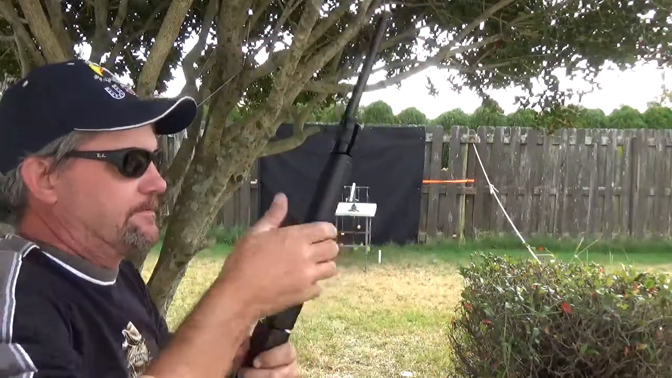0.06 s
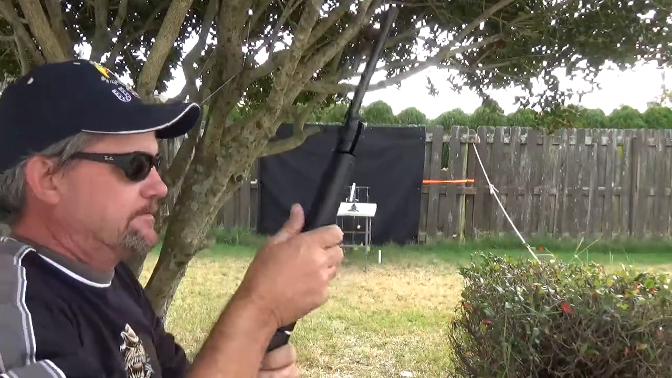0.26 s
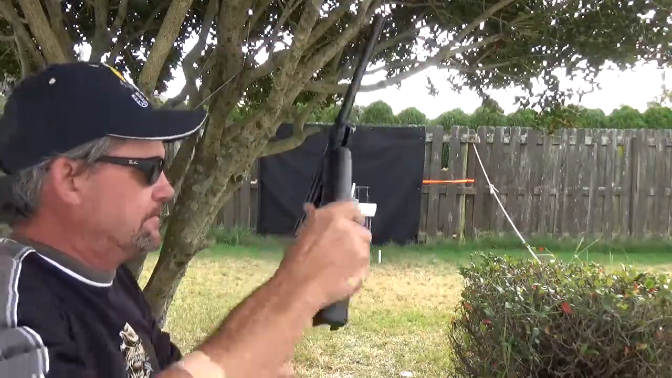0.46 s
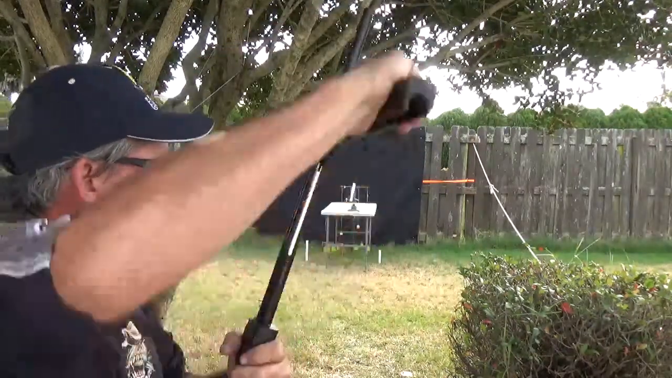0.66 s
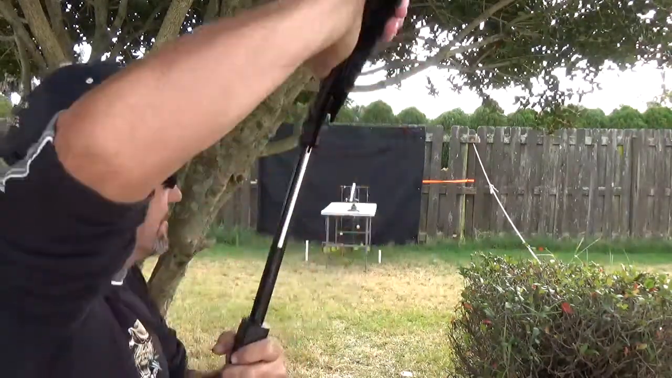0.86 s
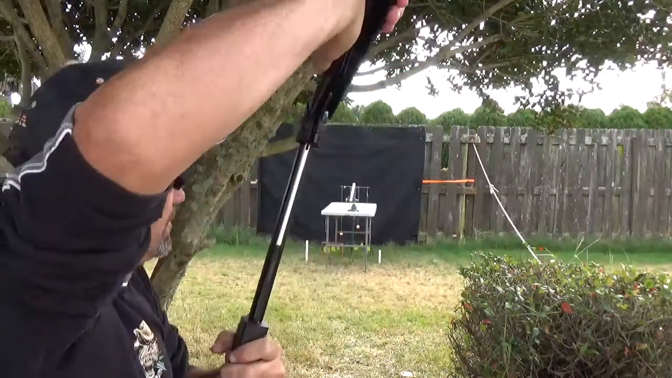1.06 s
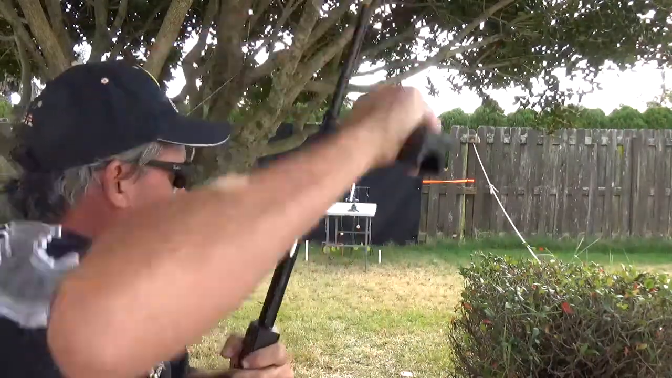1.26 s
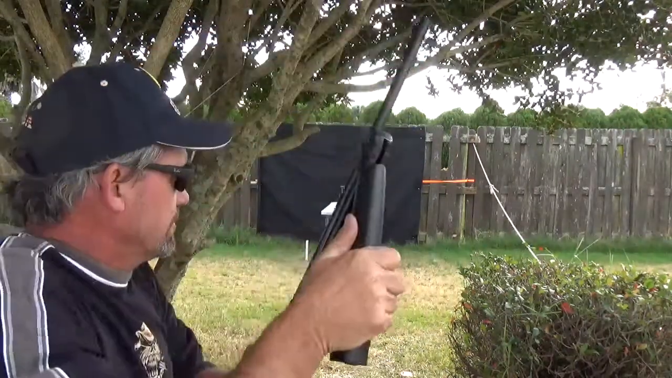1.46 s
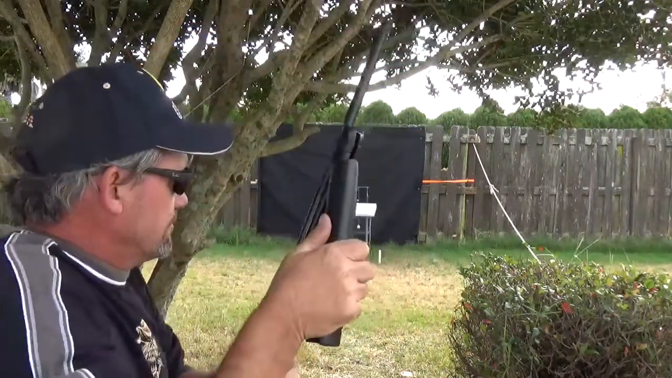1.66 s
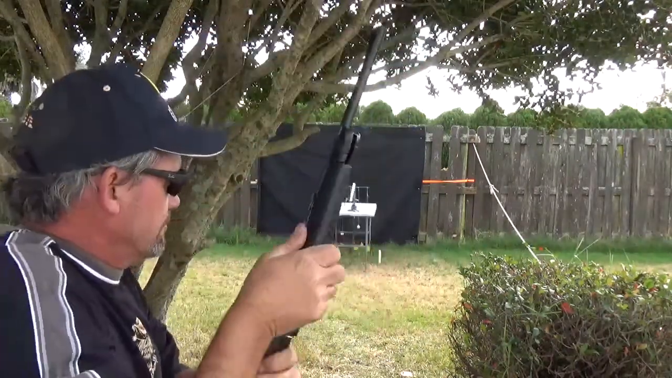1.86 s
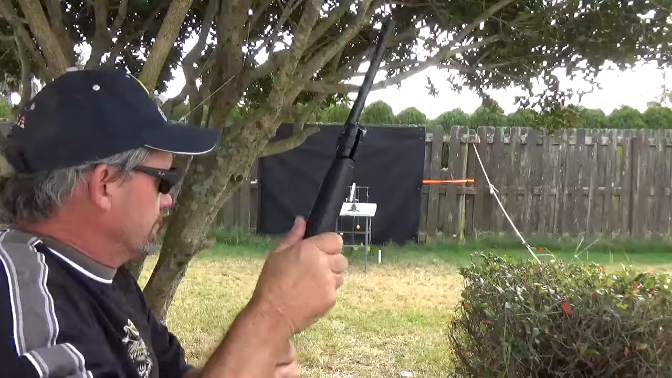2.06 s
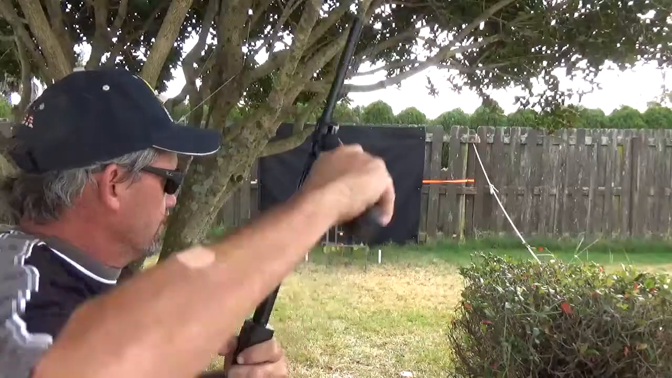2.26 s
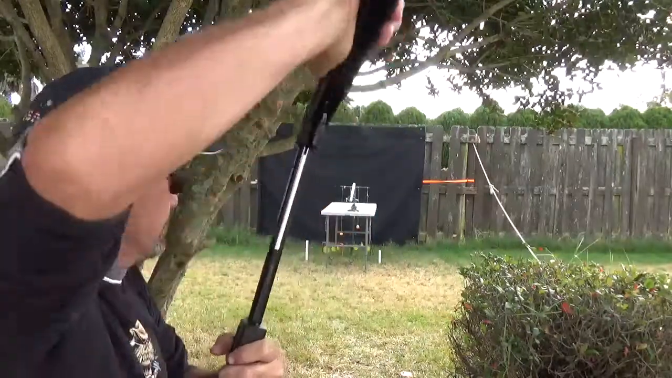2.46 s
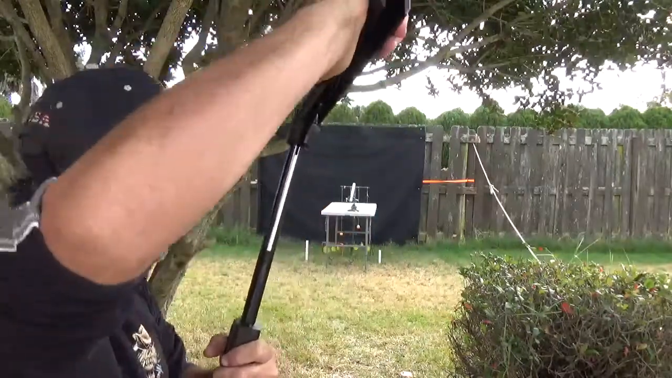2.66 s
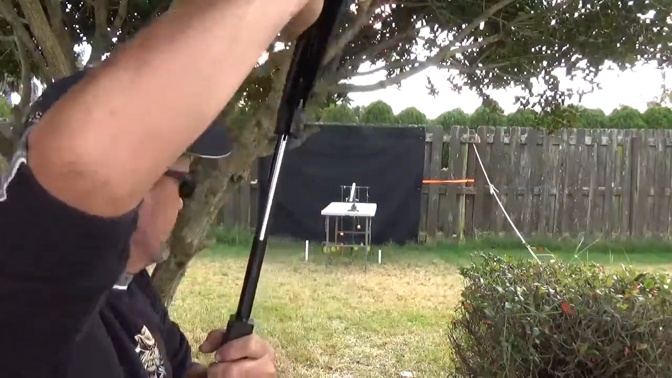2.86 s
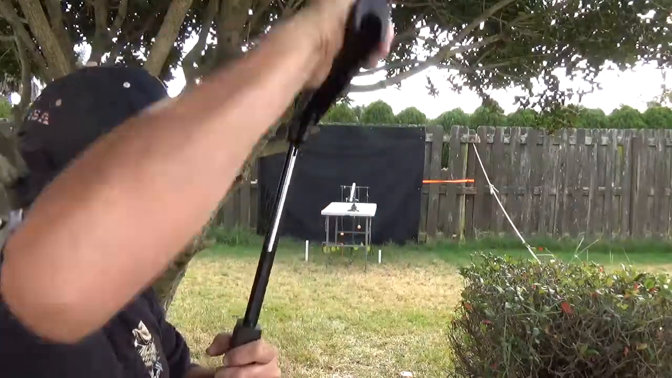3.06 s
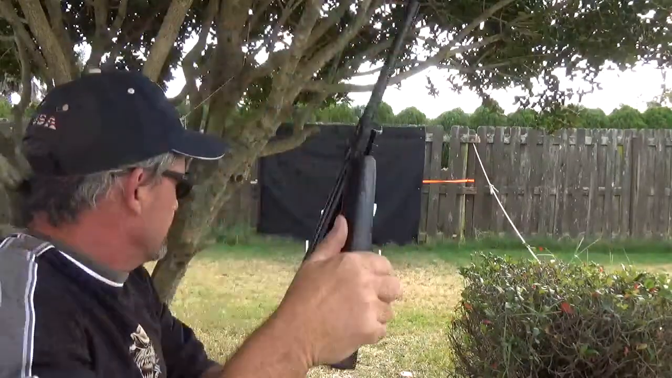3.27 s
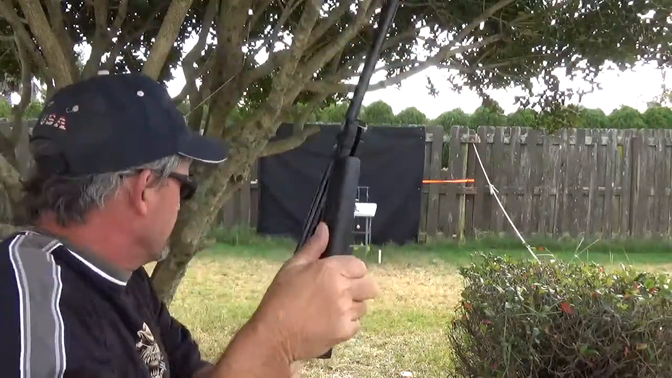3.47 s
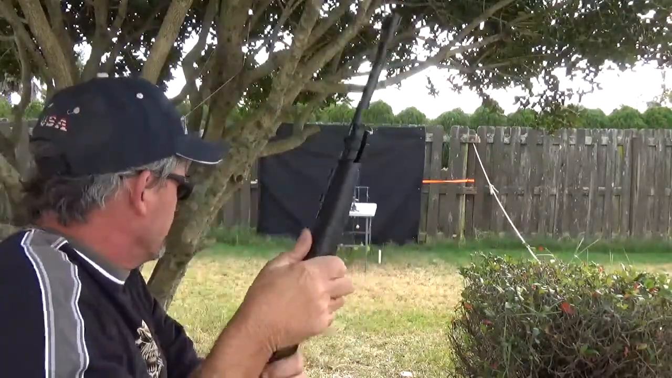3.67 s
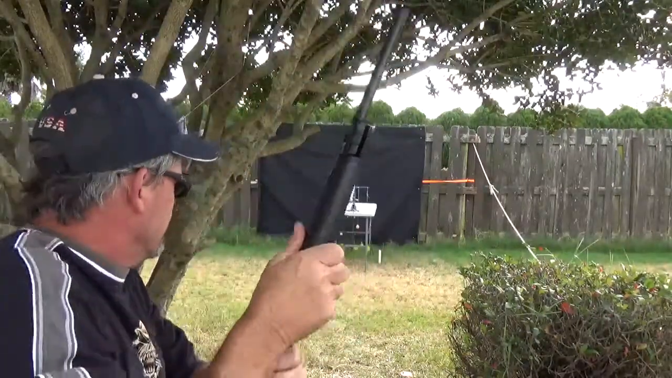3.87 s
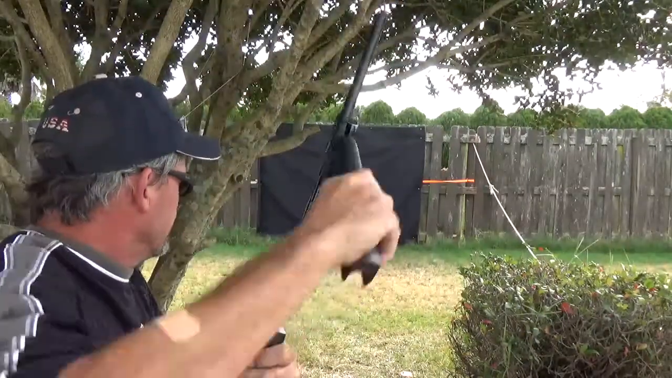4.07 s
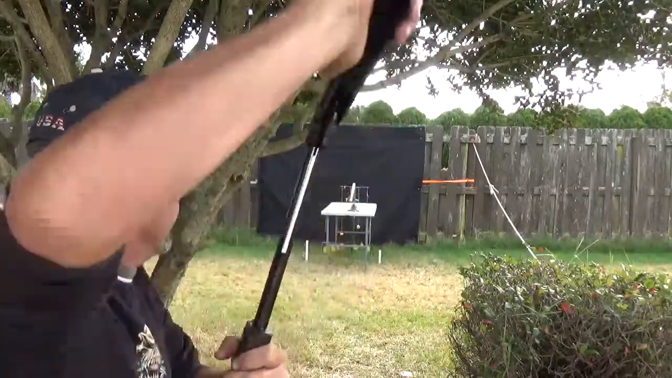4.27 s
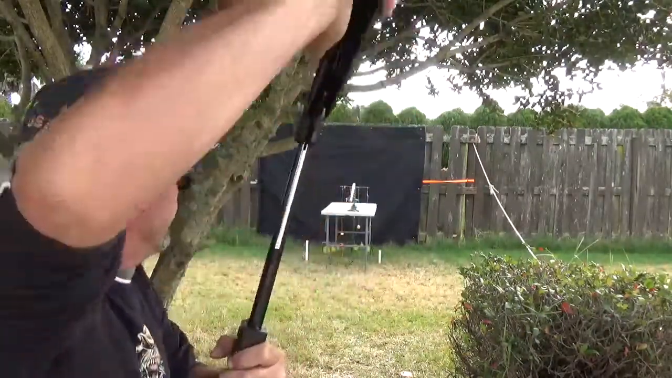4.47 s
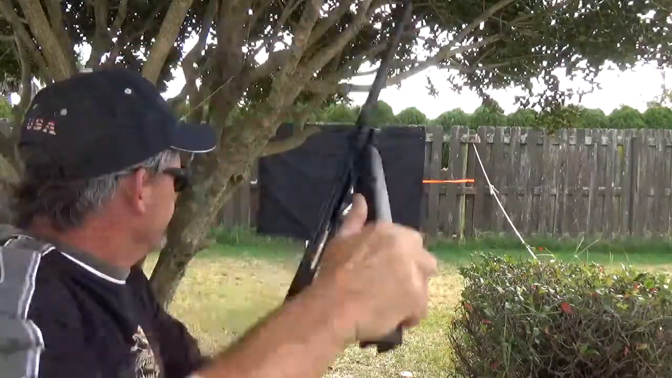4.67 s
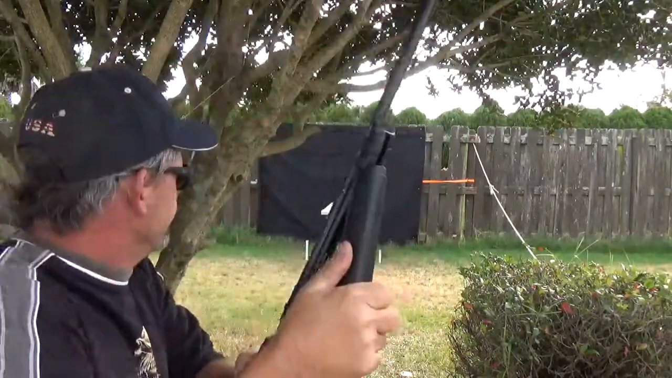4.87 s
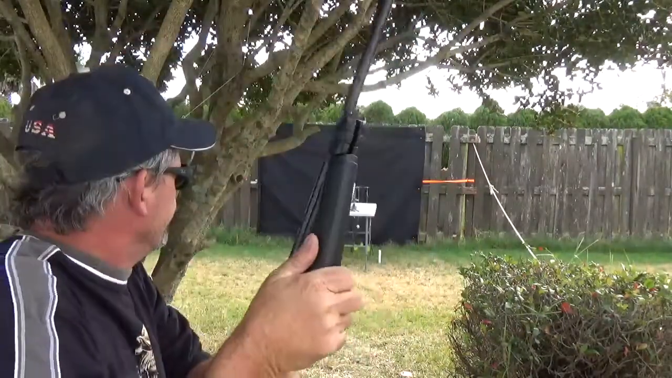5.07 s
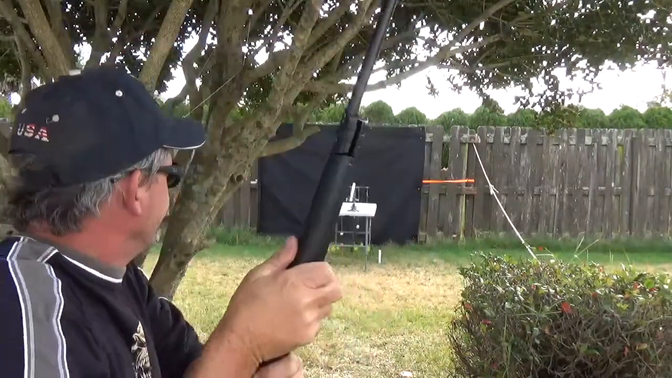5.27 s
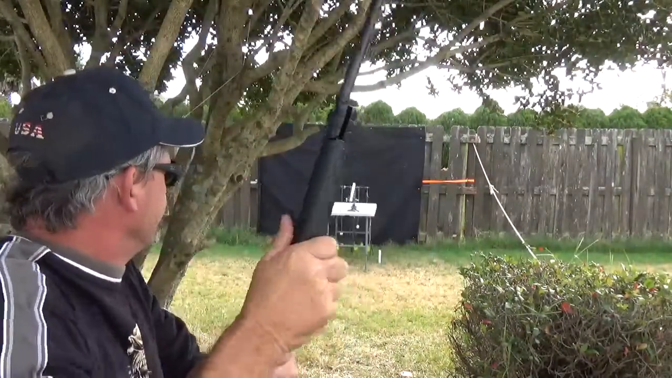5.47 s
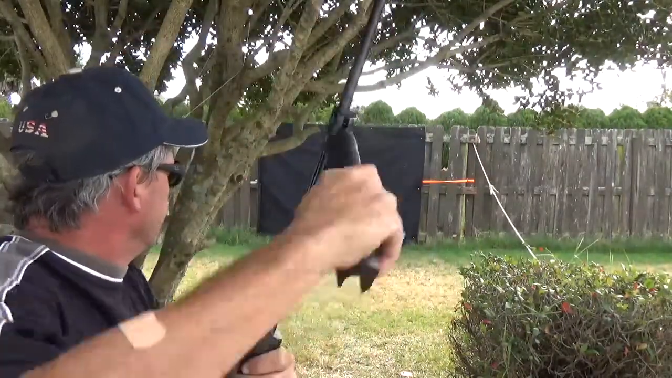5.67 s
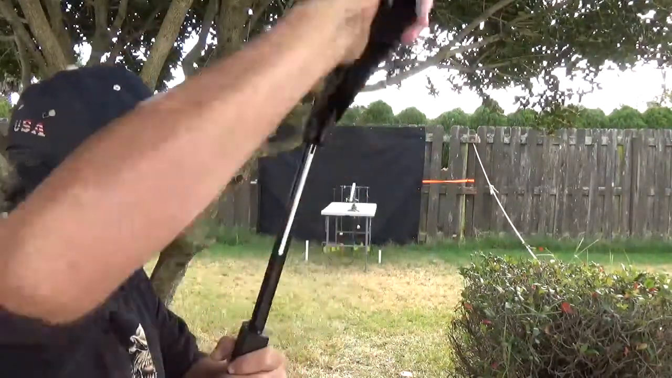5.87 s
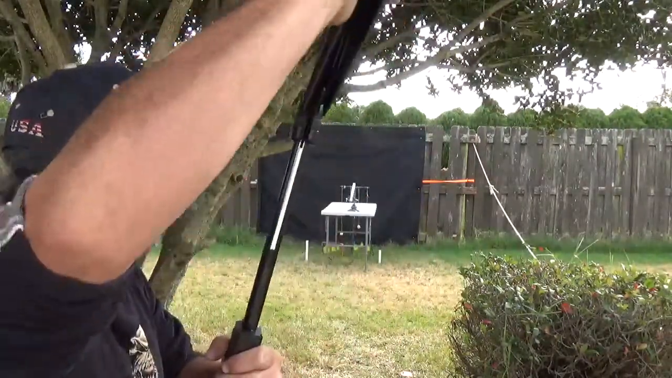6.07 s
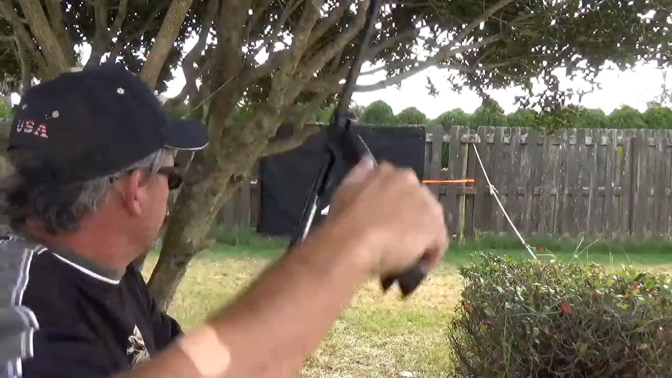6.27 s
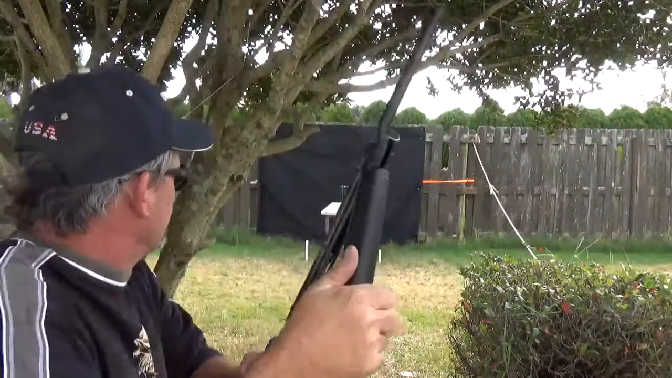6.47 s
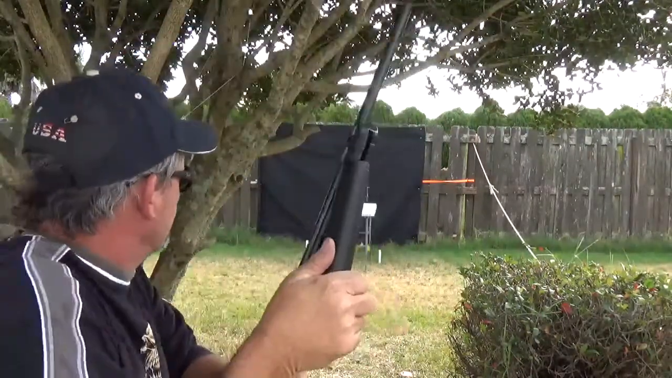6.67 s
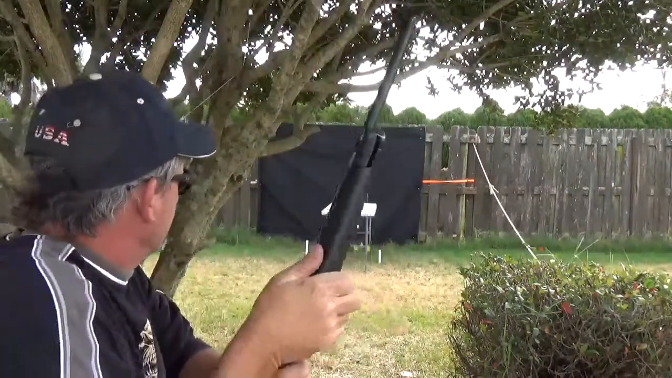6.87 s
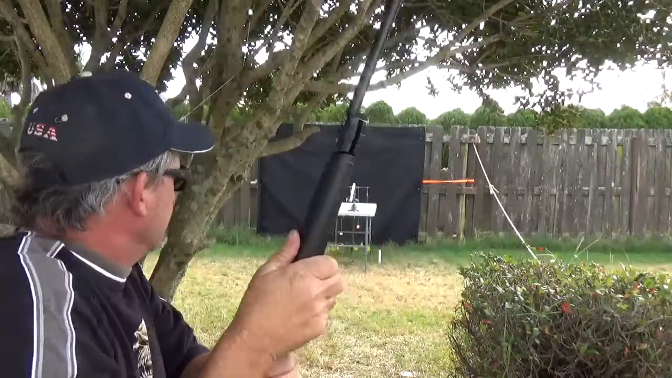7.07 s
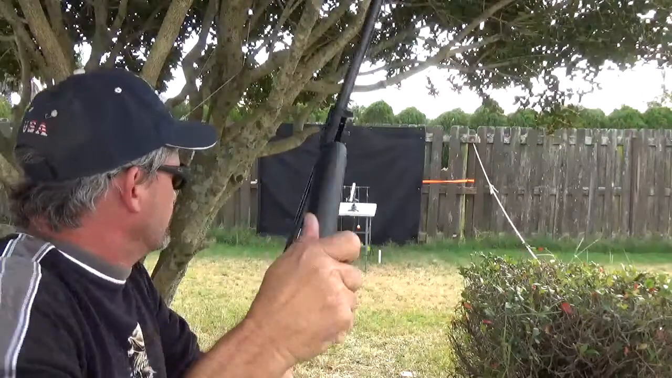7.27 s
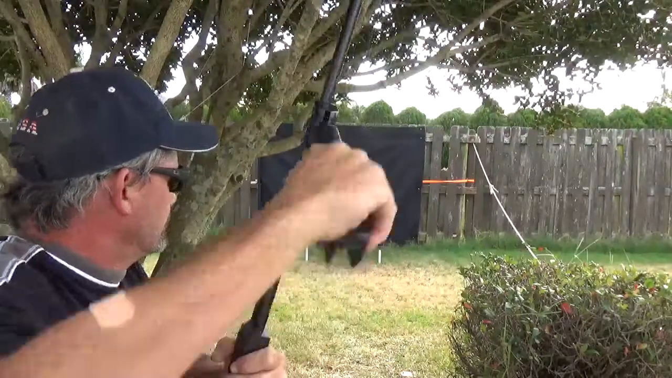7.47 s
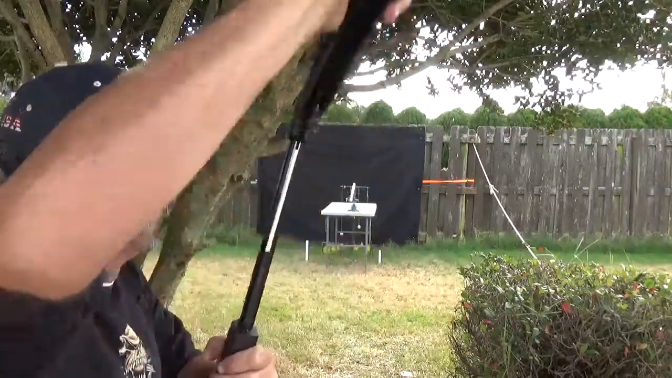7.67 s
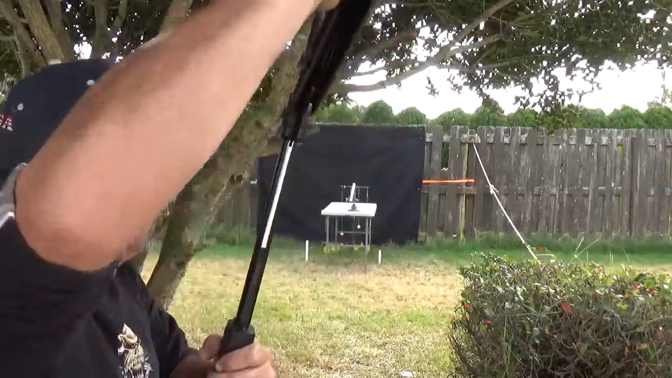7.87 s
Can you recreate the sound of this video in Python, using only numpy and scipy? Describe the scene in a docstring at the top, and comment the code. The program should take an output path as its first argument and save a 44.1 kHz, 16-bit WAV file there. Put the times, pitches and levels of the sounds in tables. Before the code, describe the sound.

Close outdoors, an air rifle's pump lever snaps free with a sharp crack, ticks open, then slams shut with a metallic buzz, over and over.

```python
"""A far traffic hum and soft rubbing come first, with faint scratches; then the lever of an air rifle snaps free.
In a fenced garden, an arm's length from a camera, the pump lever is swung open and pressed shut, again and again.
It scrapes home, slams and buzzes; pivots tick and the fences echo. Hum, rubbing, scrape and buzz are shaped noise.
Knocks are short noise bursts that ring the rifle's modes (its own pitches); whistles and the tube's song are sines."""
import sys
import numpy as np
from scipy import signal
from scipy.fft import rfft, irfft, next_fast_len
from scipy.io import wavfile
from scipy.ndimage import uniform_filter1d

SR = 44100
rng = np.random.default_rng(int(sys.argv[2]) if len(sys.argv) > 2 else 0)


def unload_wav(signal):
    """Save mono or channel-first audio to the path in sys.argv[1] as 16-bit WAV at rate SR, clipped to [-1, 1]."""
    wavfile.write(
        sys.argv[1],
        SR,
        np.round(np.clip(np.atleast_2d(signal).T, -1, 1) * 32767).astype(np.int16),
    )


N = 349272
TIME = np.arange(N) / SR
SPLIT_HZ = 3000  # "low" modes and "deep" sound lie below


def undb(db):
    """Turn decibels into an amplitude factor."""
    return 10 ** (np.asarray(db) / 20)


def unit(x):
    """Scale to rms 1."""
    return x / np.sqrt(np.mean(x ** 2))


def at_peak_one(x):
    """Scale to peak 1."""
    return x / abs(x).max()


def fade(t, t60):
    """Exponential decay that falls 60 dB in t60 s (at least 1 ms)."""
    return np.exp(-np.log(1000) * t / np.maximum(t60, .001))


def onset(t, rise_s):
    """Smooth start that climbs towards 1."""
    return 1 - np.exp(-t / rise_s)


def band(x, lo_hz, hi_hz):
    """Keep only the sound between two pitches."""
    return signal.sosfilt(signal.butter(2, [lo_hz, hi_hz], "bandpass", fs=SR, output="sos"), x)


def coloured(spectrum):
    """Noise with the given spectrum, rms 1."""
    hz, db = np.transpose(spectrum)
    size = next_fast_len(N)
    f = np.maximum(np.arange(size // 2 + 1) * SR / size, 1)
    gain = undb(np.interp(np.log(f), np.log(hz), db))
    white = rng.standard_normal(size)
    return unit(irfft(rfft(white) * gain, size)[:N])


def walk(rate):
    """Random wandering: levels held 1 / rate s, then smoothed twice."""
    hold = int(SR / rate)
    steps = np.repeat(rng.standard_normal(N // hold + 1), hold)
    return uniform_filter1d(uniform_filter1d(steps, hold), hold)[:N]


def halves(x):
    """Low and high part of a sound, each rms 1."""
    filters = [signal.butter(3, SPLIT_HZ, kind, fs=SR, output="sos") for kind in ("low", "high")]
    return [unit(signal.sosfilt(sos, x)) for sos in filters]


def patches(noise, edges, gains):
    """Bands of noise, each with its own moving gain; shifted in time so that neighbours are unrelated."""
    return sum(band(np.roll(noise, k * SR // 3), edges[k], edges[k + 1]) * g for k, g in enumerate(gains))


def stereo(mid, side, side_db):
    """Left and right from a middle and a side signal."""
    return mid + undb(side_db) * side * np.array([[1], [-1]])


# loudness of the far road, before a small random waver: (time [s], level [dB])
TRAFFIC_LEVEL = [(0, -52.5), (1.65, -54), (2.27, -49.5), (2.65, -54), (3.35, -49), (4.12, -52.5),
                 (4.4, -56.5), (5.3, -56.5), (5.6, -59.5), (6, -59), (7.92, -56)]
# colour of the road hum: (frequency [Hz], level per Hz [dB])
HUM_COLOUR = [(12, -63), (20, -44), (42, -15), (75, -8), (100, -4.5), (146, 0), (248, -11), (315, -9.5),
              (567, -25), (720, -21), (900, -42.5), (1170, -54), (1980, -120)]


def traffic():
    """Distant road rumble: deep noise whose level drifts."""
    level_db = np.interp(TIME, *np.transpose(TRAFFIC_LEVEL)) + 1.8 * walk(8)
    return undb(level_db) * stereo(coloured(HUM_COLOUR), coloured(HUM_COLOUR), -18)


FENCE_T60_S, FENCE_DB, FENCE_SIDE_DB = 0.6, -17, -16


def fences(dry):
    """A spray of echoes from fences, tree and lawn, a little different left and right."""
    t = np.arange(SR) / SR
    mid, side = rng.standard_normal((2, SR)) * fade(t, FENCE_T60_S) * onset(t, 0.011)
    wet = [band(signal.fftconvolve(dry, h / np.linalg.norm(h))[:N], 500, 6800) for h in (mid, side)]
    return undb(FENCE_DB) * stereo(*wet, FENCE_SIDE_DB)


RUB_DB, RUB_DRIFT_DB_PER_S, RUB_LOW_DB, LOW_SWELL_SHARE = -59.5, -0.54, -61.5, 0.1
SLEEVE_HZ, SLEEVE_WIDTH_HZ, SLEEVE_DB = 5560, 700, -11  # a resonance in the rubbing hiss
# colour of the rubbing of piston and sleeves: (frequency [Hz], level per Hz [dB])
HISS_COLOUR = [(290, -7), (500, 4), (584, -6.5), (709, -2.5), (872, -2), (1660, -6), (2650, -6), (3220, -9),
               (5610, -8), (10000, -9.5), (11000, -8.5), (14300, -41), (22000, -120)]
# the arm swings the lever up or down: (middle [s], length [s], swell of the rubbing [dB])
SWINGS = [(0.558, 0.31, 5.5), (1.46, 0.26, 4.5), (2.42, 0.17, 5.5), (3.214, 0.38, 5), (4.2, 0.57, 6),
          (4.676, 0.46, 5), (5.852, 0.28, 6.5), (6.324, 0.16, 10), (7.05, .2, 3.5), (7.592, .35, 6)]
# the arm rests at the top of the swing and the bright rubbing drops: (start [s], end [s], change [dB])
RESTS = [(0.938, 1.147, -6), (2.855, 3.006, -5), (4.37, 4.461, -8), (5.99, 6.094, -4.5),
         (7.764, 7.87, -4.5)]


def slide(patchy_db=2.34, grain_db=2.0):
    """Rubbing hiss and rustle that swell with the arm's motion, each range flickering a little."""
    swell_db = sum(db * np.exp(-(2 * (TIME - s) / length) ** 2) for s, length, db in SWINGS)
    high_db = RUB_DB + RUB_DRIFT_DB_PER_S * TIME + swell_db
    low_db = RUB_LOW_DB + LOW_SWELL_SHARE * swell_db
    edges = 400 * 2 ** np.arange(0, 5.3, .65)
    flicker = [undb(patchy_db * walk(45)) for _ in edges[1:]]
    rest_db = sum(db * ((TIME > start) & (TIME < end)) for start, end, db in RESTS)
    rub = undb(grain_db * walk(320) + uniform_filter1d(rest_db, SR // 100))
    parts = []
    for _ in range(2):  # middle, then side
        deep, bright = halves(patches(coloured(HISS_COLOUR), edges, flicker))
        white = rng.standard_normal(N)
        sleeve = band(white, SLEEVE_HZ - SLEEVE_WIDTH_HZ / 2, SLEEVE_HZ + SLEEVE_WIDTH_HZ / 2)
        bright = bright + undb(SLEEVE_DB) * unit(sleeve) * flicker[0]
        parts.append(undb(low_db) * deep + undb(high_db) * bright * rub)
    return stereo(*parts, -15.0)


# a faint rough whistle that mostly glides down:
# (start [s], end [s], start pitch [Hz], end pitch [Hz], level [dB])
WHISTLES = [(1.45, 1.814, 2740, 2240, -64.5), (2.247, 2.696, 2620, 2300, -66.5),
            (2.754, 3.022, 2300, 2200, -66.5), (3.13, 3.27, 3020, 3030, -62),
            (3.194, 3.455, 2850, 2370, -63), (3.414, 3.658, 2005, 1860, -61.5),
            (4.1, 4.357, 2820, 2520, -65), (4.366, 4.5, 2130, 2000, -64), (4.843, 5.087, 2680, 2750, -67.5),
            (5.131, 5.242, 2730, 2920, -53.5), (6.846, 6.908, 2580, 2600, -56)]


def whistles():
    """A thin rough tone with unsteady pitch and level."""
    out, waver_hz, flutter = np.zeros(N), 36 * walk(120), undb(4 * walk(60))
    for start, end, start_hz, end_hz, db in WHISTLES:
        span = slice(int(start * SR), int(end * SR))
        hz = np.interp(TIME[span], [start, end], [start_hz, end_hz]) + waver_hz[span]
        tone = np.sin(2 * np.pi * np.cumsum(hz) / SR)
        out[span] += undb(db) * signal.windows.tukey(len(hz), .5) * flutter[span] * tone
    return out


# short scratches of skin on plastic and dry joints:
# (middle [s], half of the whole length [s], centre [Hz], nominal width [Hz], level before the swell [dB])
SCUFFS = [(0.055, 0.023, 1150, 500, -46.5), (0.085, .03, 1260, 597, -58), (0.165, 0.08, 1360, 400, -58),
          (0.175, 0.037, 1210, 300, -56.5), (0.183, 0.033, 5260, 5430, -49.5),
          (0.225, 0.013, 1270, 500, -56), (0.61, 0.013, 2600, 410, -51), (1.451, 0.017, 3000, 2960, -58),
          (3.327, 0.014, 2560, 1200, -49.5), (4.207, 0.013, 3130, 700, -48.5),
          (4.346, 0.017, 6360, 4000, -48.5), (4.603, 0.025, 3600, 1510, -45.5),
          (4.638, 0.016, 4040, 1520, -38), (4.637, 0.018, 8000, 2970, -47), (5.975, 0.017, 1096, 405, -55),
          (7.584, 0.038, 3570, 2540, -53), (7.745, 0.022, 7350, 5000, -50), (7.754, 0.02, 1147, 1235, -51)]


def scuffs():
    """Grainy noise in one resonance, swelling and fading."""
    out = np.zeros(N)
    grains = rng.standard_normal(N) * undb(5.5 * walk(360))
    for s, length, hz, width, db in SCUFFS:
        span = slice(int((s - length) * SR), int((s + length) * SR))
        top_hz = hz + width / 2
        sound = unit(band(grains[span], hz ** 2 / top_hz, top_hz))
        out[span] += undb(db) * sound * np.hanning(len(sound))
    return out


# the stock jolts in the hand: (time [s], peak level [dB], centre [Hz])
THUMPS = [(1.915, -28.5, 318), (2.816, -42.5, 437), (3.711, -28, 334), (4.35, -39.5, 480), (5.24, -28, 330),
          (5.974, -44.5, 440), (6.919, -28, 327), (7.75, -49, 450)]


def thumps(t60=0.048):
    """Dull short knocks through wood and palm: fading noise in a low band."""
    out, t = np.zeros(N), np.arange(4096) / SR
    for s, db, hz in THUMPS:
        sound = band(rng.standard_normal(len(t)) * fade(t, t60), 0.55 * hz, 1.72 * hz)
        out[int(s * SR):][:len(t)] += undb(db) * at_peak_one(sound)
    return out


SLAM_LOW_DB, SCRAPE_LOW_DB, SNAP_LOW_DB = -5, -0.5, -2.1  # weight of the deep part
TUBE_HZ, TUBE_T60_S, SNAP_TUBE_DB = (10870, 10988), .21, -44
GRIP_DB, GRIP_T60_S = -29, 1  # the grip murmurs on under every buzz
SQUEAL_HZ, SQUEAL_RISE_SHARE = 7850, 0.433
# colour of the buzz and scrape: (frequency [Hz], level per Hz [dB])
RATTLE_COLOUR = [(88, -41.5), (150, -20.5), (334, -13.5), (414, -13), (541, -24), (759, -5.5), (845, -10),
                 (907, -13.5), (1210, 3.5), (1950, -7.5), (2250, -2), (3710, -7.5), (6210, 1.5),
                 (10000, -5.5), (10600, 0.5), (13800, -29), (22000, -120)]


def rattle(grit_db=3, patchy_db=3.5):
    """Dense tiny contacts: the buzz after hard blows and the scrape before slams; the steel tube sings."""
    noise = coloured(RATTLE_COLOUR)
    # each range of modes is shaken by its own parts, so the colour shifts in patches
    edges = 150 * 2 ** np.arange(0, 6.4, .7)
    noise = patches(noise, edges, [undb(patchy_db * walk(160)) for _ in edges[1:]])
    deep, bright = halves(noise * undb(grit_db * walk(900)))
    out = np.zeros(N)
    buzzes = [(s, db, SLAM_LOW_DB, t60, tube_db) for s, _, _, _, _, _, db, t60, tube_db, *_ in SLAMS]
    buzzes += [(s + stop, db, SNAP_LOW_DB, t60, SNAP_TUBE_DB) for s, _, stop, *_, db, t60 in SNAPS]
    for s, db, low_db, t60, tube_db in buzzes:
        t = np.maximum(TIME - s, 0)
        late = np.maximum(t - .003, 0)  # the plastic grip answers a little after the steel
        buzz = onset(t, 0.0013) * bright + undb(low_db) * onset(late, 0.00057) * deep
        out += undb(db) * fade(t, t60) * buzz
        out += undb(db + GRIP_DB) * fade(t, GRIP_T60_S) * onset(late, 0.015) * deep
        # a close pair of tube modes beats
        pair = np.sin(2 * np.pi * TUBE_HZ[0] * t) + 0.44 * np.sin(2 * np.pi * TUBE_HZ[1] * t)
        pair = pair * undb(4 * walk(70))  # its level wavers at random
        out += undb(tube_db) * onset(t, 0.0027) * fade(t, TUBE_T60_S) * pair
    squeal = unit(band(rng.standard_normal(N), SQUEAL_HZ - 280, SQUEAL_HZ + 280))
    for s, *_, lead, rise, db, squeal_db in SLAMS:
        # the scrape grows with the load, then holds until the blow; its squeal sets in earlier
        under_db = np.where(TIME < s, rise * np.minimum(TIME - s + lead, 0), -np.inf)
        scrape = undb(under_db) * (undb(-1.0) * bright + undb(SCRAPE_LOW_DB) * deep)
        out += undb(db) * (scrape + undb(squeal_db + SQUEAL_RISE_SHARE * under_db) * squeal)
    return out


TICK_CHATTER_T60_S = .014
# kinds of contact: (weight of the low modes [dB], chatter t60 [s], favoured pitch [Hz])
TOUCH, SLAM_REBOUND = (-16.5, 0.0017, 3900), (2, 0.012, 1200)
SNAP_CRACK, SNAP_STOP = (-28, .01, 7000), (-6, .009, 1340)
SNAP_REBOUND, SNAP_SETTLE = (0, .038, 2720), (3, .015, 1500)
SETTLE_S, SETTLE_DB = .0045, -4  # after and relative to the rebound
# play in pivots and catch: (time [s], level [dB], weight of the low modes [dB], favoured pitch [Hz])
TICKS = [(.341, -22.5, 3.5, 1410), (.357, -30, 2.5, 5550), (.4462, -18.5, -11, 4730), (.597, -43, -6, 2300),
         (.823, -41, -5, 5620), (.862, -38.5, -14, 6390), (.92, -46, -6, 1180), (1.157, -33, -11, 5400),
         (1.175, -25, -11, 5560), (1.199, -18, -9, 4970), (1.215, -36, 2, 1570), (1.495, -34.5, -8, 5660),
         (1.547, -22.5, -30.5, 8000), (1.785, -23.5, -8, 3700), (1.845, -23.5, -1, 2640),
         (1.8711, -23.5, 1, 1520), (2.084, -12.5, -15, 5500), (2.162, -30, 0, 1320), (2.64, -23, -15, 3700),
         (2.689, -45.5, 9, 2260), (2.744, -35, -20, 9710), (2.817, -35, -4, 1040),
         (3.028, -21.5, -16, 4640), (3.047, -21, -6.5, 4660), (3.066, -24.5, -1, 2300),
         (3.269, -33.5, -31.5, 5620), (3.352, -35.5, -1, 1488), (3.619, -28.5, -1.5, 1070),
         (3.672, -29.5, 8.5, 2820), (3.685, -15.5, -18.5, 8000), (3.906, -22.5, 0.5, 1980),
         (4.017, -19, -3, 4700), (4.029, -17.5, -15, 7870), (4.349, -36, -2.5, 1000),
         (4.48, -18.5, -12, 4640), (4.498, -29.5, -4.5, 4800), (4.522, -41, 4, 1080),
         (4.808, -42.5, 6, 3000), (4.839, -38, -7.5, 6130), (5.155, -36.5, -1.5, 2760),
         (5.203, -24.5, 2, 7930), (5.462, -24.5, -0.5, 1750), (5.578, -18, -8, 4700),
         (5.588, -24, -15, 4680), (6.114, -21, -16, 3410), (6.138, -20.5, -14.5, 4630),
         (6.469, -42.5, 2, 2170), (7.169, -30.5, 0.5, 1780), (7.391, -21.5, -4, 7820),
         (7.397, -19.5, -4, 4700), (7.892, -21, -26, 5040), (7.911, -23.5, -7, 4580)]
# contacts of every slam: (delay [s], level relative to the slam [dB], weight of the low modes [dB],
# chatter t60 [s], favoured pitch [Hz])
SLAM_CONTACTS = [(0, -6, -20, 0.0048, 8000), (.0014, -5, -19.5, 0.029, 5500), (.0051, -13, -1, .018, 2300),
                 (0.1003, -33, 5, 0.11, 1200)]
# the lever slams shut: (time [s], level [dB], first touch this long before [s], its level [dB],
# rebound delay [s], its level [dB], buzz [dB], buzz t60 [s], steel tube ring [dB],
# scrape at full force this long before [s], its rise [dB/s], scrape [dB], squeal relative to scrape [dB])
SLAMS = [(1.9118, 1, 0.0029, 0.5, 0.013, -25.5, -16, 0.27, -24, 0.047, 2004, -34, -1.5),
         (3.707, 2, 0.0031, -8, 0.024, -8.5, -16, 0.27, -18.5, .019, 694, -31, -8.5),
         (5.2353, 3.5, .0058, -17, 0.019, -18, -13.5, 0.21, -14, .027, 1001.5, -31.5, -6.5),
         (6.913, 3.5, 0.0061, -29, .0254, -16, -13, 0.21, -25.5, 0.011, 707, -34, -14)]
# the lever tears free of its catch: (time [s], crack level [dB], stop delay [s], its level [dB],
# rebound delay [s], its level [dB], buzz [dB], buzz t60 [s])
SNAPS = [(0.3823, -6, 0.0045, -4.5, 0.024, -13, -22, 0.14),
         (2.0966, -1.5, 0.0031, 0.5, 0.02, -13, -22.5, 0.19),
         (3.9258, -1.5, 0.003, -0.5, 0.024, -13, -23, 0.19),
         (5.4857, -1.5, .0027, -2.5, 0.02, -16, -23.5, 0.19),
         (7.2297, -5, 0.005, -1, .0172, -14, -21.5, .2)]


def contacts():
    """All that strikes: (time s, level dB, low modes dB, chatter t60 s, pitch Hz)."""
    rows = [(s, db, low_db, TICK_CHATTER_T60_S, hz) for s, db, low_db, hz in TICKS]
    for s, db, lead, touch_db, after, rebound_db, *_ in SLAMS:
        rows += [(s + lag, db + under_db, *rest) for lag, under_db, *rest in SLAM_CONTACTS]
        rows += [(s - lead, touch_db, *TOUCH), (s + after, rebound_db, *SLAM_REBOUND)]
    for s, db, stop, stop_db, after, rebound_db, *_ in SNAPS:
        rows += [(s, db, *SNAP_CRACK), (s + stop, stop_db, *SNAP_STOP)]
        rows += [(s + after, rebound_db, *SNAP_REBOUND)]
        rows += [(s + after + SETTLE_S, rebound_db + SETTLE_DB, *SNAP_SETTLE)]
    return rows


HIGH_T60_S = .018  # cap on the ring of the high modes
# the rifle's modes: (frequency [Hz], level [dB], ring t60 before scaling [s])
RIFLE_MODES = [(766.4, -19, 0.38), (1183, -4.5, 0.091), (1488, -6.5, 0.075), (1597, -12.5, 0.25),
               (1765, -13.5, 0.17), (2597, -0.5, 0.09), (2900, -8.5, 0.24), (3460, -9, 0.42),
               (3660, -9.5, 0.22), (3740, -35, 0.14), (4800, -35.5, 0.21), (4810, -2.5, 0.45),
               (4760, -4, 0.42), (4850, -12.5, 0.35), (5344, -15, 0.36), (5725, 1.5, 0.12),
               (6300, -8.5, 0.089), (6360, -22, 0.37), (6330, -15.5, 0.21), (6100, -26.5, 0.1),
               (7550, -18, 0.8), (8400, 2, 0.54), (9800, -30.5, 0.15), (9460, 4, 1), (9600, 1.5, 0.3),
               (10570, -18.5, 0.093)]


def knocks(ring_share=0.26, crack_db=6, scatter_db=3, detune=0.014, favour_db=13, spread=0.11):
    """Each contact chatters briefly, cracks and rings the rifle's modes, most of all those near its own pitch."""
    out, t = np.zeros(N + 4096), np.arange(4096) / SR
    hz, db, t60 = np.transpose(RIFLE_MODES)
    low = hz < SPLIT_HZ
    # the modes ring for a fraction of this t60, the high ones shortest
    ring_t60 = np.minimum(ring_share * t60 * (1500 / hz) ** 0.92, np.where(low, 1, HIGH_T60_S))
    decay = fade(t, ring_t60[:, None])
    for s, level_db, low_db, chatter, pitch in contacts():
        mix, shift = rng.standard_normal((2, len(hz)))
        favour = np.exp(-(np.log(hz / pitch) / spread) ** 2)
        gain = undb(db + scatter_db * mix + favour_db * favour)
        mode_hz = hz * (1 + detune * shift)
        rings = gain[:, None] * np.sin(2 * np.pi * mode_hz[:, None] * t) * decay
        blow = rng.standard_normal(len(t)) * fade(t, chatter) * np.minimum(t / 0.00012, 1)
        deep, bright = (signal.fftconvolve(blow, rings[part].sum(0))[:len(t)] for part in (low, ~low))
        crack = band(blow, 1966, np.clip(1.9 * pitch, 6000, 14000))  # lower contacts are softer, so duller
        bright = at_peak_one(bright) + undb(crack_db) * at_peak_one(crack)
        slap = band(blow, 1100, 2300)
        deep = at_peak_one(deep) + undb(-3.5) * at_peak_one(slap)
        sound = at_peak_one(bright) + undb(low_db) * at_peak_one(deep)
        i = int(s * SR)
        out[i:i + len(t)] += undb(level_db) * sound
    # keep the knocks free of bass; the thumps carry the low part
    return signal.sosfilt(signal.butter(4, 620, "high", fs=SR, output="sos"), out[:N])


def scene():
    """Rifle close by and slightly left, its echoes, the rubbing and whistles, and the far road."""
    rifle = scuffs() + thumps() + rattle() + knocks()
    # the rifle's spread in space leaves a small late part in the side
    late = np.roll(rifle, 9) - np.roll(rifle, 23)
    near = stereo(rifle, late, -25.5) * undb([[.15], [-.15]])
    return traffic() + fences(rifle) + slide() + whistles() + near


TOP_HZ = 11030


def record(dry):
    """Loudest peaks are rounded; nothing sounds above about 11 kHz."""
    steep = signal.firwin(601, TOP_HZ, window=("kaiser", 7), fs=SR)
    rounded = np.tanh(0.8 * dry) / 0.89
    return signal.fftconvolve(rounded, steep[None], "same", axes=1)


dry = scene()
out = record(dry)
unload_wav(out)
```